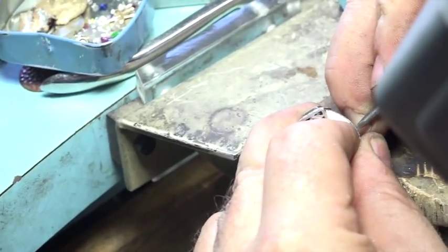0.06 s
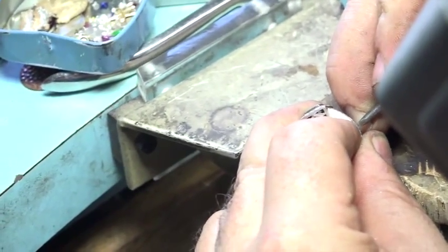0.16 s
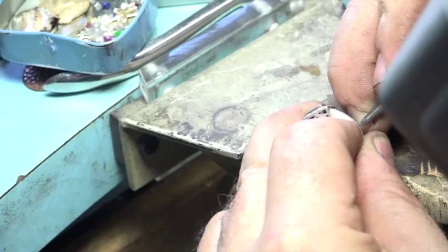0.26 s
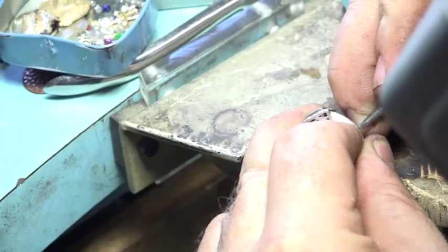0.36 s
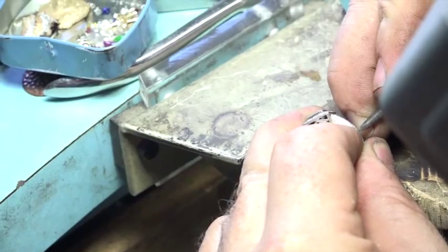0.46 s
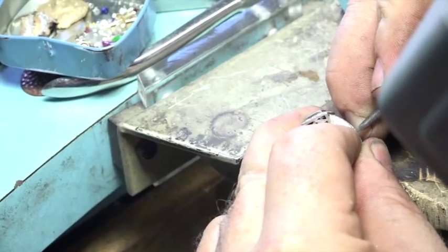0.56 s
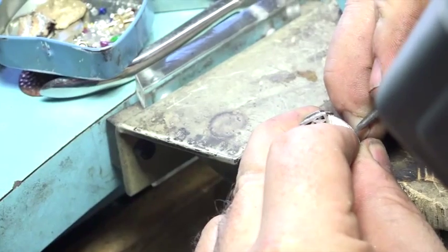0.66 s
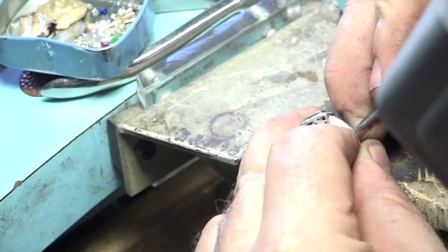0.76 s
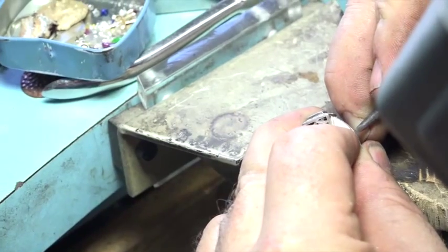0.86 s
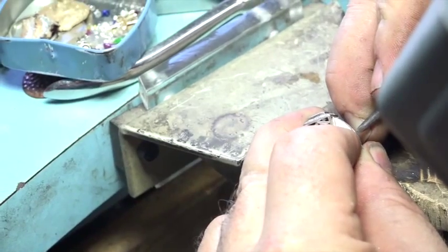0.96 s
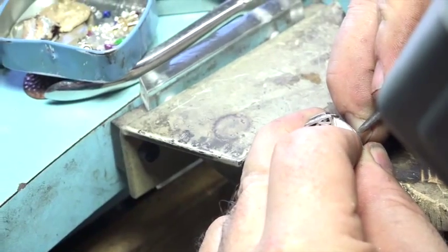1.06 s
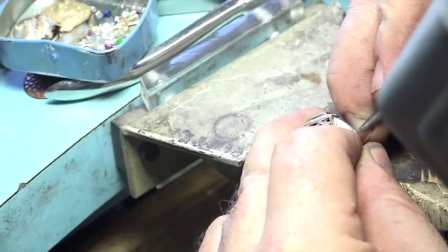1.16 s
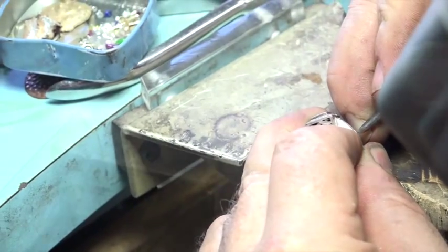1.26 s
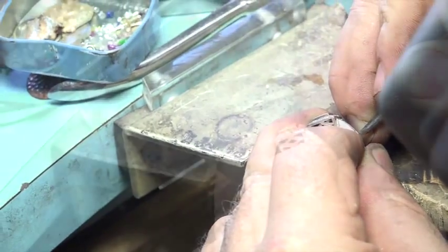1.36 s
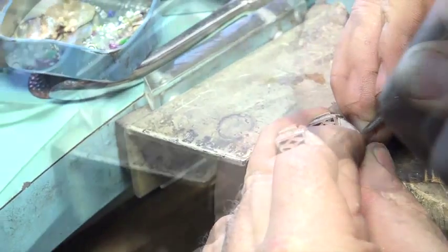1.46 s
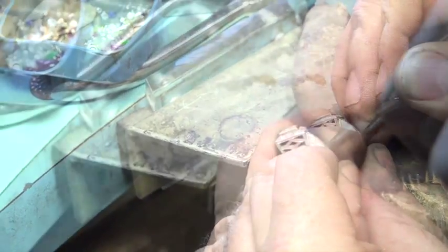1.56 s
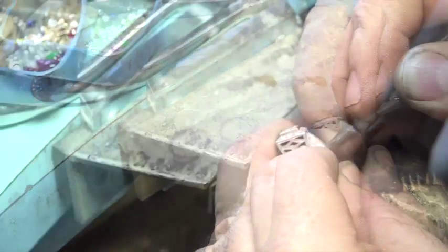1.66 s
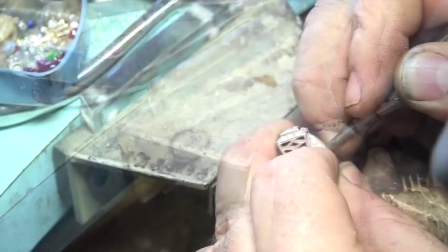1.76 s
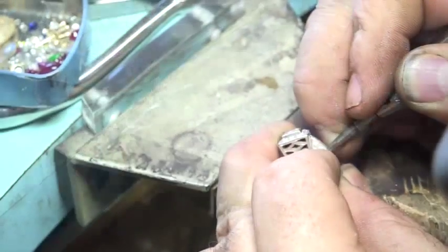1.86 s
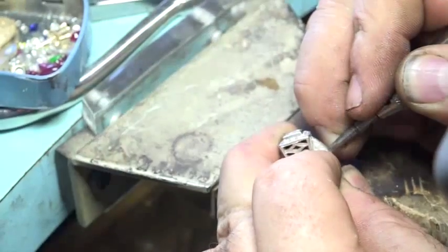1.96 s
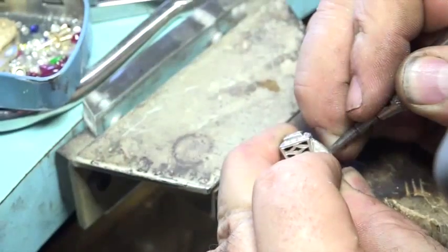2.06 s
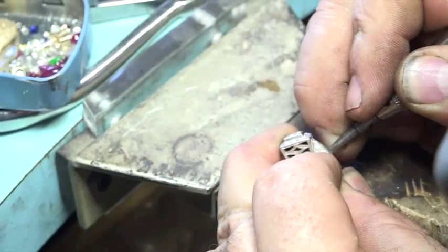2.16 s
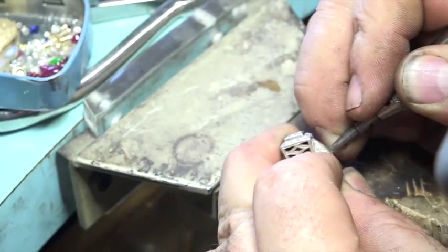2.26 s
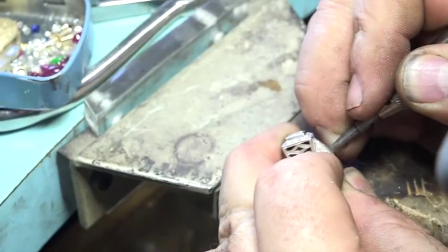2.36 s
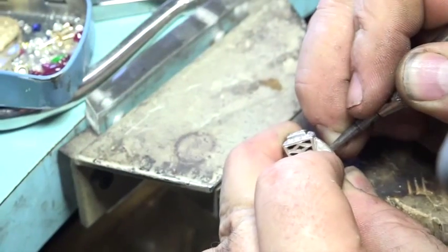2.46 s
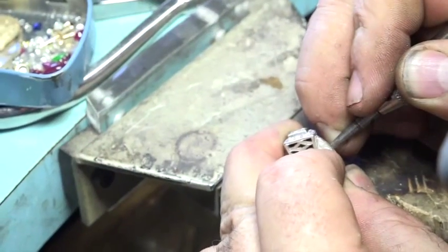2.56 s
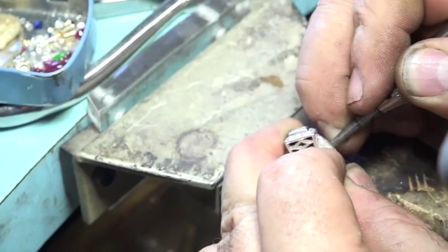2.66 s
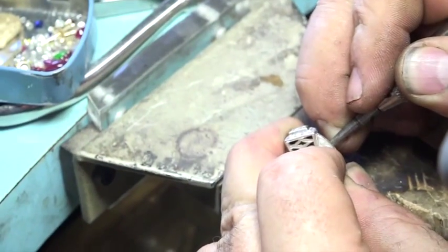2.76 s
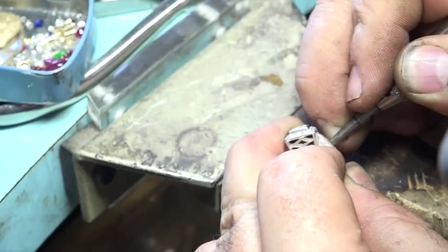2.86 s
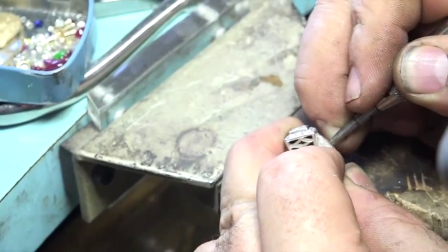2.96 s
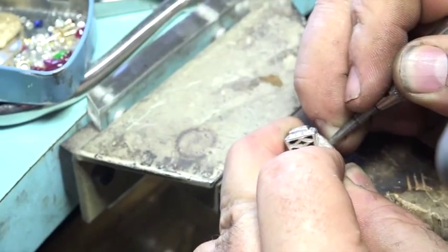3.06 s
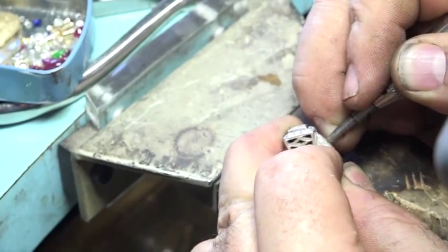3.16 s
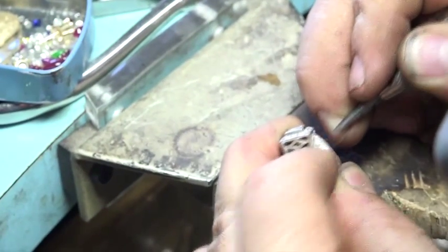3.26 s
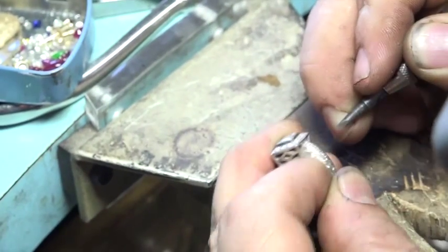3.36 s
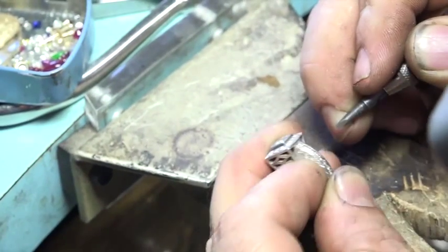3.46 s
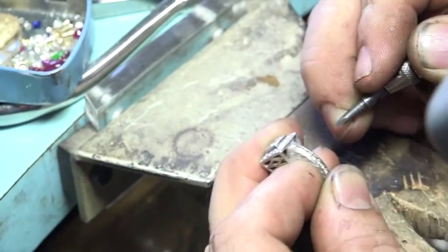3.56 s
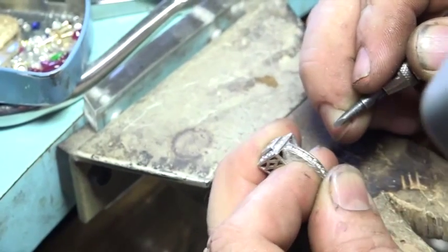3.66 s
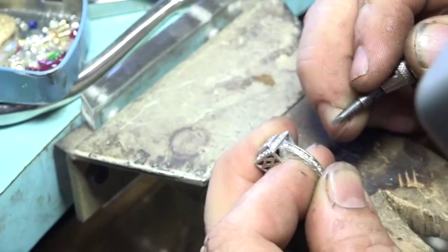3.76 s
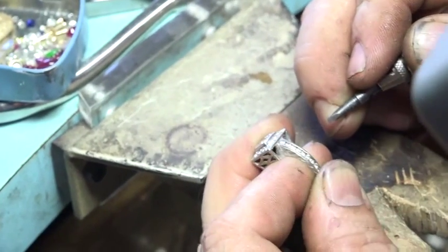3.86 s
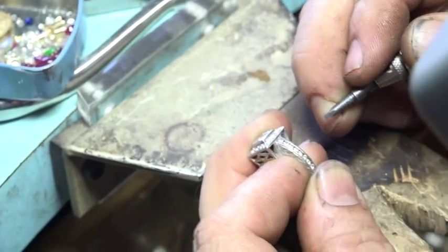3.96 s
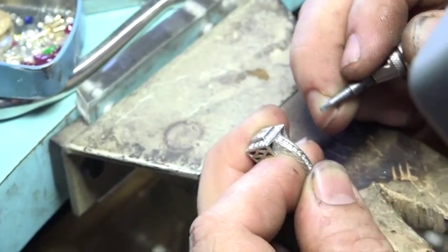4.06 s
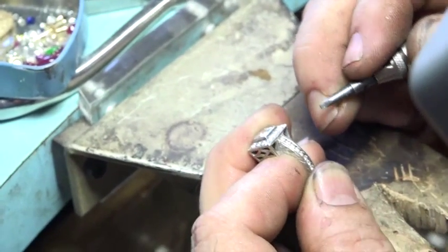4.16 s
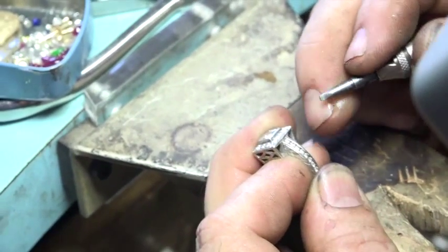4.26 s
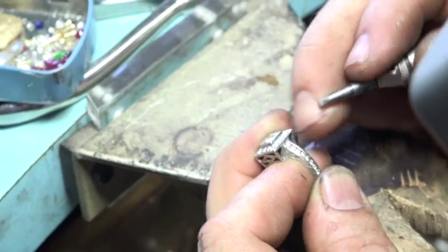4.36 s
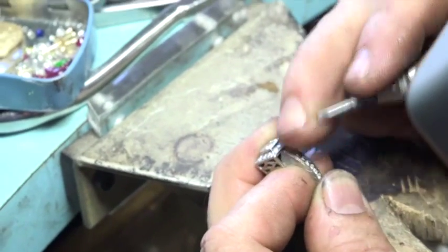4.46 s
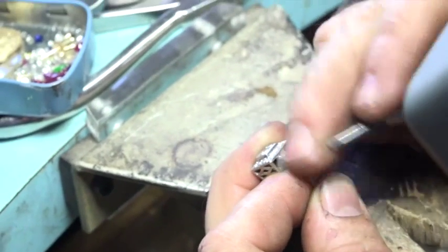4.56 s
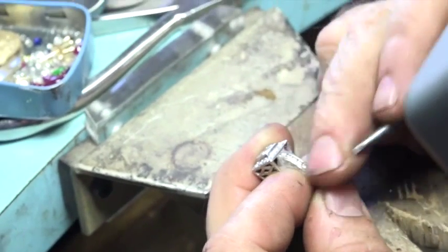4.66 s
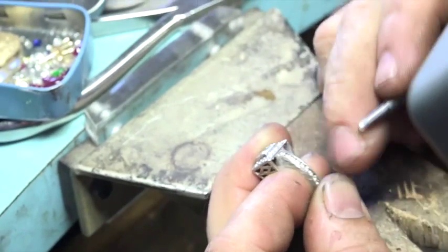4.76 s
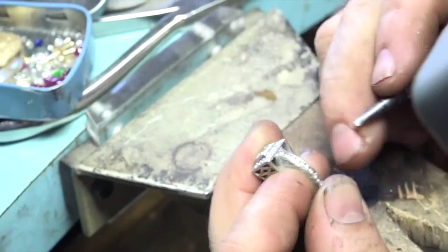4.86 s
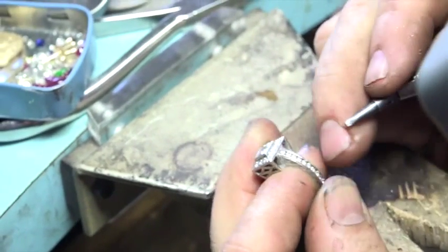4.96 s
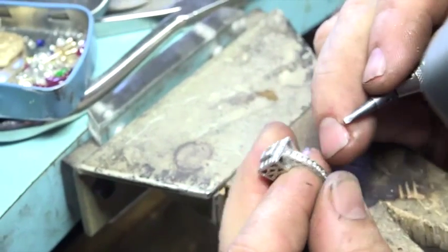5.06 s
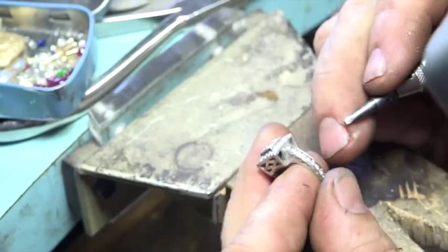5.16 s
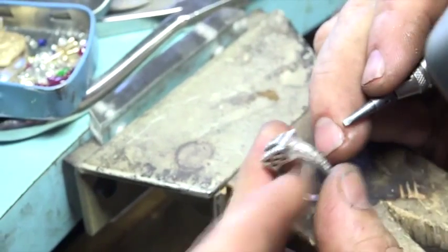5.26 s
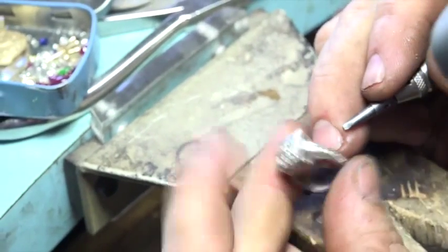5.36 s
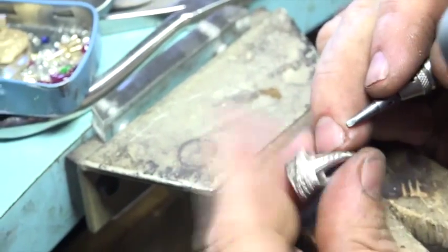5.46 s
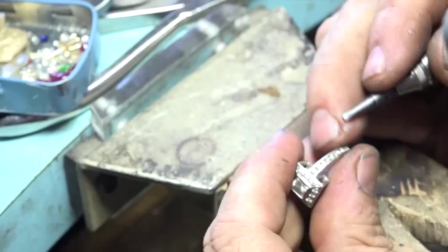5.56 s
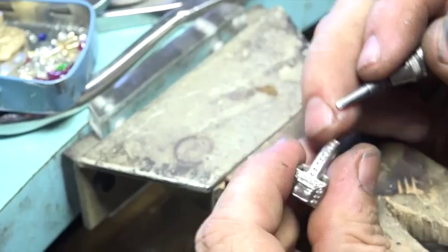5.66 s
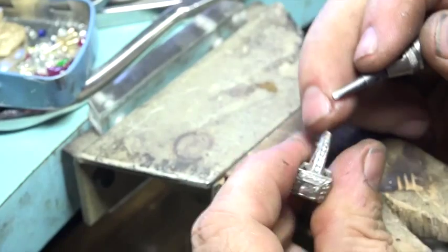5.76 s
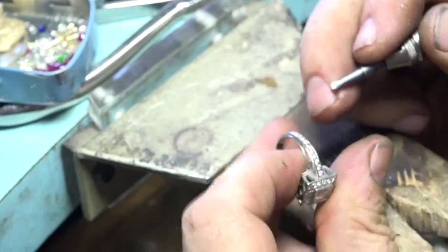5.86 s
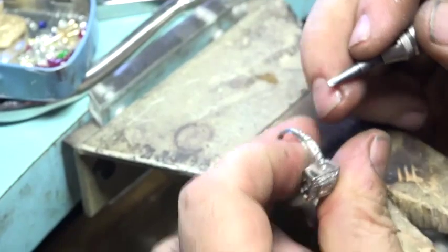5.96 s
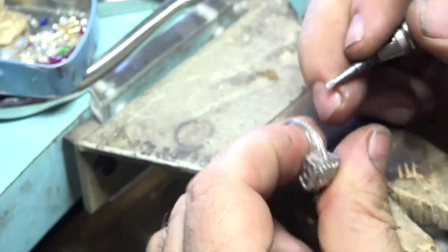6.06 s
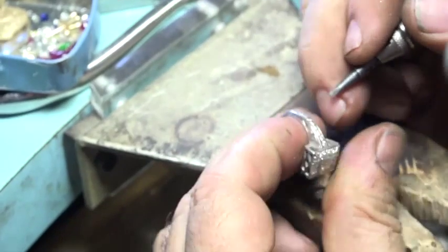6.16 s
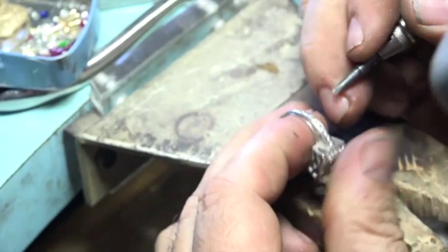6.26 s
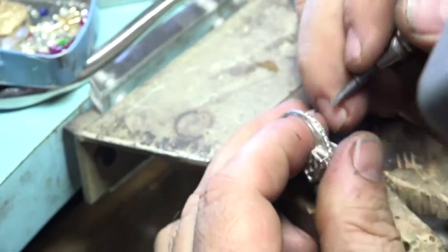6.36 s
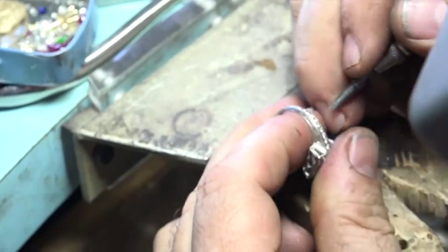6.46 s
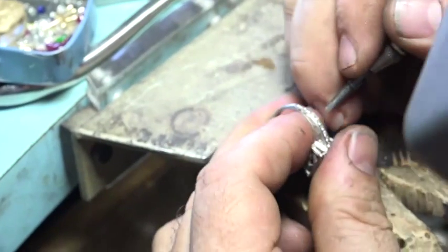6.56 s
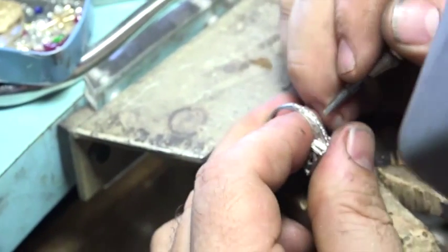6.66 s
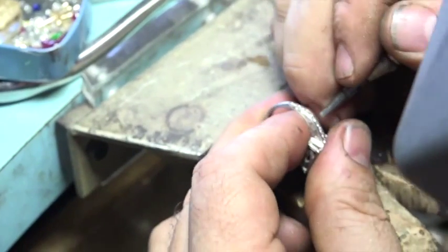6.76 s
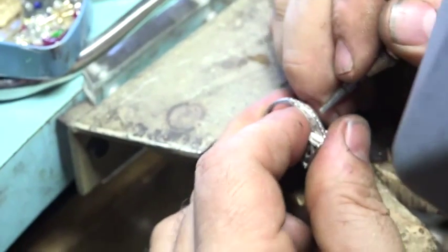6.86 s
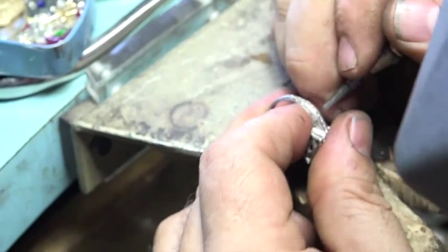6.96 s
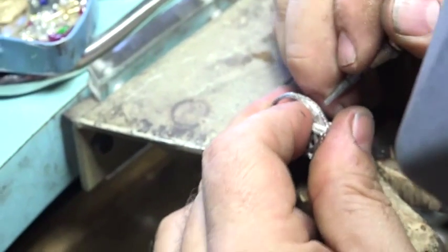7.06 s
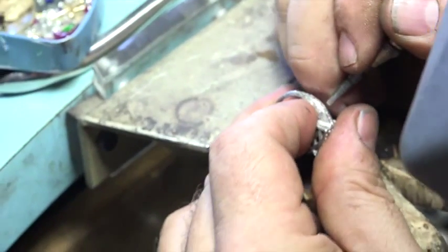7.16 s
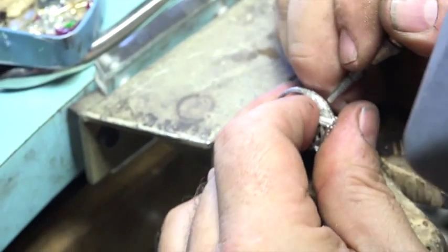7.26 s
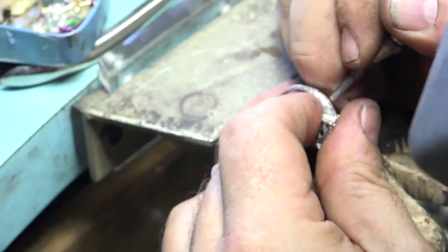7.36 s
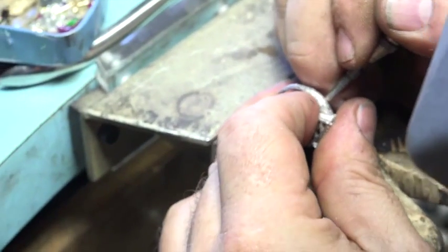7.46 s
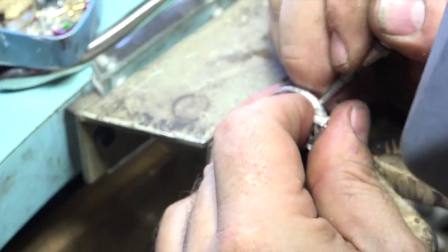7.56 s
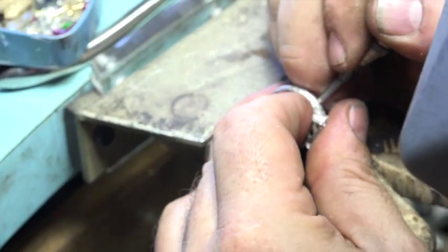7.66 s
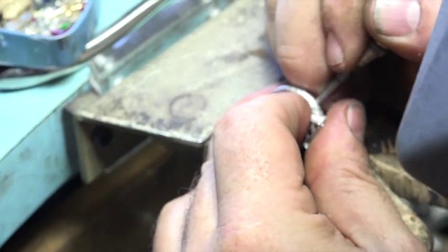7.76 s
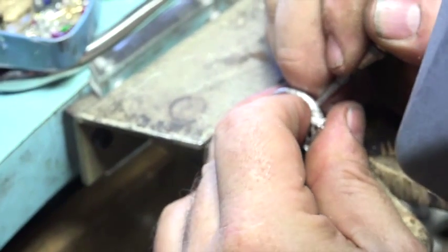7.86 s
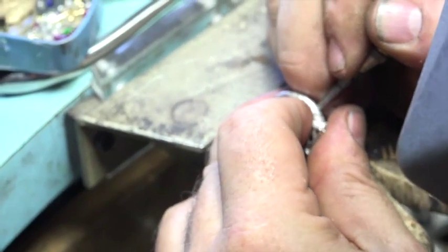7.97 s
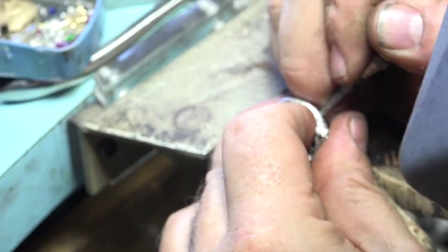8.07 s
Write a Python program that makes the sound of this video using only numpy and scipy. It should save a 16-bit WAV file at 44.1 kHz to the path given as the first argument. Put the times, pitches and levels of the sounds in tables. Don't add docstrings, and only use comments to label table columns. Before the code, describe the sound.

Fast bright metallic hammering at about twenty raps a second, a hummy workshop pause with tiny scrapes, then slower hard raps speeding up again.

```python
import sys
import numpy as np
from scipy import signal
from scipy.fft import rfft, irfft, next_fast_len
from scipy.io import wavfile
from scipy.ndimage import uniform_filter1d

SR = 44100
rng = np.random.default_rng(int(sys.argv[2]) if len(sys.argv) > 2 else 0)


def unload_wav(signal):
    wavfile.write(
        sys.argv[1],
        SR,
        np.round(np.clip(np.atleast_2d(signal).T, -1, 1) * 32767).astype(np.int16),
    )


def field_ratio(decibels):
    return 10 ** (np.asarray(decibels, dtype=float) / 20)


N = 358003
SIZE = next_fast_len(N + SR)
HZ = np.maximum(np.arange(SIZE // 2 + 1) * SR / SIZE, 1)

# time_s, speed_turns_per_s
CAM_SPEED = [
    [(0.0307, 22.4), (0.288, 23.65), (0.512, 19.81), (0.956, 20.29), (1.06, 19.49), (1.199, 20.35),
     (1.572, 19.55), (1.768, 21.58)],
    [(1.3567, 26.45), (1.694, 28.14), (1.837, 27.1), (2.326, 29.27), (2.749, 23.54), (3.104, 24.37),
     (3.314, 26.48), (3.5612, 6.3)],
    [(7.0911, 9.7), (7.282, 9.25), (7.453, 16.21), (7.638, 18.52), (7.69, 17.38), (8.002, 21.02),
     (8.0841, 24.7)],
]
# time_s, peak_db
FORCE = [
    [(0, -7), (.6, -7.5), (1.0, -8), (1.4, -7.5), (1.6, -10), (1.77, -16.5)],
    [(1.35, -13.5), (1.55, -13.5), (1.9, -7.5), (2.5, -9.5), (2.95, -8), (3.25, -6.5), (3.36, -8.5),
     (3.56, -7)],
    [(7.09, -5.5), (7.3, -6.5), (7.6, -6), (7.75, -4.5), (8.1, -5.5)],
]
USUAL_SPEED = (21, 26, 19)
# start_s, peak_db
SLIP = (7.063, -19)
# thud_db, low_steel_db, high_steel_db, top_db
CONTACT = [(-1.5, 3.5, -1, -2), (-2.5, 0.94, 3, -1), (-5, 2, -0.3, -4)]
BRIGHTER = (0.035, 0.086, 0.26, 0.21)
# cam_tick_db, rebound_db, chatter_db, shank_ring_db
BOUNCE = [(-18, -3.5, -0.5, -2.5), (-15, -9, 0, -1), (-18, -6, -6, -2)]
SLACK = (0, 0, 1.1)
# pitch_hz, level_db
STRIKE = [(300, -24), (700, -9), (2500, -2), (4100, -3.5), (4900, -4.5), (7500, -2.5), (9000, -5.5),
          (10500, -0.5), (12500, -5.5), (15300, -13.5), (16200, -24.5)]
# pitch_hz, level_db, decay_s (to -60 dB)
STEEL = [(4890, -24.5, 0.019), (4940, -23.5, 0.0129), (5970, -13.5, 0.012), (5640, -47.5, 0.012),
         (6420, -21.5, 0.027), (7160, -12.5, 0.0082), (7360, -51, 0.0172), (7510, -23.5, 0.053),
         (7680, -25.5, .02), (8040, -10.5, 0.0053), (9164, -19.5, 0.023), (9680, -21.5, 0.0089),
         (12900, -24, .012)]
# pitch_hz, level_db, decay_s (to -60 dB)
BENCH = [(922, -27, 0.029), (1102, -25.5, 0.032), (1244, -26.5, 0.028), (1666, -46, 0.013),
         (2103, -32, 0.032), (3120, -23, 0.027), (3720, -20.5, 0.021)]
# start_s, peak_db
TOUCHES = [
    (4.625, -38),
    (6.3824, -28),
    (6.6534, -34),
    (6.7331, -56),
    (6.7867, -25.5),
    (6.9002, -41),
    (7.268, -19),
    (7.882, -18),
    (7.985, -19),
]
# pitch_hz, level_db
TOUCH = [(500, -17), (1200, 0), (2500, 3), (3300, 1.5), (5500, -3.5), (7400, -12), (12000, -21)]
# pitch_hz, width_hz, level_db
RING = [(1880, 210, -0.5), (2270, 150, -6), (3130, 410, -4), (3640, 270, -9), (4600, 250, -8.5),
        (5370, 410, 0), (7020, 500, -5), (10400, 400, -18.5)]
# peak_s, level_db, rise_s, fall_s
SLIDES = [
    (5.11, -50.5, 0.15, 0.086),
    (5.81, -52.5, 0.54, 0.17),
    (6.39, -49.5, 0.14, 0.44),
    (6.55, -53.5, .3, .4),
    (6.65, -45, .03, .09),
    (6.78, -47.5, 0.037, 0.39),
]
# start_s, level_db
ENGAGE = [
    (6.982, -19.5),
    (6.987, -16.5),
    (6.991, -19.5),
    (7.052, -24),
]
# pitch_hz, level_db
CATCH = [(500, -28), (1100, -12.5), (2500, -17), (3100, -8), (3550, -0.5), (4100, -13), (5000, -11),
         (8000, -24.5), (13000, -25), (16000, -27.5)]
# pitch_hz, level_db, decay_s
CLACK = (4700, -20, 0.038)
# time_s, growl_db
MOTOR = [
    [(0, -39.5), (.5, -42), (.97, -42), (1.46, -41.5), (1.82, -39.5), (2.67, -38.5), (3.2, -38.5),
     (3.3, -39.5), (3.56, -86)],
    [(6.9, -74), (7.05, -38.5), (7.17, -45.5), (7.35, -44.5), (7.7, -41.5), (8.12, -41)],
]
# pitch_hz, width_hz, level_db
GROWL = [(174, 11, 3.5), (280, 30, -9.5), (323, 168, 9.5)]
# pitch_hz, level_db, decay_s
HOUSING = [(275, -4, .11), (395, 0, .075), (500, -5, .08)]
# pitch_hz, tone_db, haze_width_hz, haze_db
FAN = [(58.2, -69.5, 4, -54.5), (86.3, -46.5, 3.7, -57), (173, -66, 5, -57), (249.4, -58, 14, -67.5),
       (451, -57.5, 14, -58), (578.6, -48.5, 16, -60.5), (635, -54.5, 7.56, -60), (990, -60.5, 10, -64.5),
       (1380, -59.5, 9.2, -73), (1636, -70.5, 23, -65.5), (3320, -72.5, 60, -68), (4610, -76, 99, -71),
       (4540, -78, 130, -68), (4830, -61, 60, -79), (4910, -66.5, 70, -65.5), (5130, -74.5, 80, -77)]
# pitch_hz, level_db
SHOP = [(30, -7), (60, -2), (120, -6.5), (260, -0.5), (450, -9.5), (700, -11), (1200, -13.5), (2500, -21),
        (4200, -25), (4800, -29), (5600, -26.5), (7000, -33.5), (9000, -39)]
# time_s, gain_db
GAIN = [(0, 0.5), (3.55, -0.5), (3.9, -1), (5.2, 2.5), (6.95, 3.5), (7.4, 1.5), (8.12, -2)]
# time_s, level_db
WET = [(0, -2.5), (1.5, 0), (2, -4), (3.3, -4), (3.7, 2.5), (7.05, 1.5), (7.3, 4.5), (7.6, 0), (8.12, -1.5)]
# pitch_hz, likeness
LIKENESS = [(60, -0.91), (130, -0.48), (290, 0.75), (1400, 0.61), (3100, 0.98), (6800, -0.36),
            (15000, 0.043)]
# pitch_hz, left_minus_right_db
COVERED_PORT = [(60, -8), (200, -12.5), (1000, -10), (2500, -14), (4200, -18.5), (6000, -10), (7000, -5),
                (7700, 5), (8500, 5), (9500, 1), (10500, -1), (12000, -18.5), (15000, -12)]
# pitch_hz, level_db
HISS = [(1000, -9.5), (5000, -16), (9500, -5), (12500, 4.5), (14300, -2.5), (14900, -7), (15300, -52.5)]


def blows():
    rows = [[SLIP + (2, -9.5)]]
    for k, (speeds, force) in enumerate(zip(CAM_SPEED, FORCE)):
        knots, speed = np.transpose(speeds)
        t = np.arange(knots[0], knots[-1], 1 / SR)
        turns = np.cumsum(np.interp(t, knots, speed)) / SR
        s = np.interp(np.arange(round(turns[-1]) + 1), turns, t)
        peak_db = np.interp(s, *np.transpose(force))
        faster = np.interp(s, knots, speed) - USUAL_SPEED[k]
        rows.append(np.column_stack([s, peak_db, 0 * s + k, faster]))
    return np.vstack(rows).T


def hammer():
    s, peak_db, passes, faster = blows()
    which = passes.astype(int)
    luck = np.clip(rng.standard_normal((len(s), 4)), -2, 2).T
    contact = np.array(CONTACT)[which] + np.outer(faster, BRIGHTER)
    thud_db, low_db, high_db, top_db = contact.T[:, :, None]
    tick_db, rebound_db, loose_db, shank_db = np.array(BOUNCE)[which].T
    peak_db = peak_db - 0.28 * luck[0]
    rebound_s = 0.0072 + 0.0016 * luck[1]
    rebound_db = rebound_db + 2.5 * luck[2]
    tick_db = tick_db + 2.5 * luck[3] - np.array(SLACK)[which] * faster
    tick_db[np.abs(s - SLIP[0]) < .05] = -40

    chance = rng.random((len(s), 11))
    chatter_s = np.cumsum(.0006 + .0022 * chance[:, :5], axis=1)
    chatter_db = loose_db[:, None] - 1 - 1900 * chatter_s + 5 * (chance[:, 6:] - .5)
    tick_s = -.0035 - .0015 * chance[:, 5] - .0015 * (passes == 2)
    times = s[:, None] + np.column_stack([tick_s, 0 * s - .0003, rebound_s, chatter_s])
    blows_db = np.column_stack([tick_db + 5, 0 * s, rebound_db - 1, chatter_db]) + peak_db[:, None] + 5

    shared, own = rng.choice([-1, 1], (2, N))
    grit = np.array([0.9 * shared + 1.6 * own, shared])

    def crack(db, t60):
        return grit * dying(dying(clicks(times, field_ratio(blows_db + db)), t60), 0.0012)

    out = band(crack(thud_db - 27.5, 0.02), 320, 2960)
    out += band(crack(low_db - 19, 0.017), 4730, 6560)
    out += band(crack(-14.5, 0.0098), 6780, 8315)
    out += band(crack(high_db - 16.5, 0.0053), 8056, 10690)
    out += band(crack(top_db - 18.5, 0.015), 10100, 20900)
    out = colour(out, STRIKE)

    for hz, level_db, t60 in STEEL + BENCH:
        if hz < 2500:
            tilt_db = thud_db
        elif hz < 4300:
            tilt_db = thud_db + shank_db[:, None]
        elif hz < 6600:
            tilt_db = low_db
        else:
            tilt_db = high_db if hz > 8500 else 0
        spread_db = 1.5 if hz < 2500 else 3
        each = field_ratio(blows_db + tilt_db + level_db + spread_db * rng.standard_normal(times.shape))
        each[:, 2:] *= .45
        sign = rng.choice([-1, 1], times.shape)
        if hz < 4300:
            sign[:, 1] = 1
        grip = rng.choice([-1, 1], (len(s), 1)) * (hz > 4300)
        for k in np.unique(grip):
            out += ring(clicks(times + .0004, each * sign * (grip == k)), hz * (1 + 0.014 * k), t60)
    return out


def pickup():
    s, peak_db, passes, faster = blows()
    speed = faster + np.array(USUAL_SPEED)[passes.astype(int)]
    luck = rng.standard_normal((len(s), 2)).T
    load_db = np.interp(s, *np.transpose(MOTOR[0] + MOTOR[1])) + 43
    knock_db = peak_db + 0.5 * load_db + 7.5 - 31.5 + 4 * luck[1]
    early_s = 0.24 / speed * (1 + .08 * luck[0])
    return dying(clicks(s - early_s, field_ratio(knock_db)), 0.027)


def sliding():
    t = np.arange(N) / SR
    slides = sum(field_ratio(db - 10 * np.maximum((s - t) / rise, (t - s) / fall)) for s, db, rise, fall in SLIDES)
    return slides * (t < ENGAGE[0][0])


def handling():
    noise = stereo_noise()
    grit = rms_one(colour(noise, TOUCH))
    grit = rms_one(grit + 3.5 * sum(field_ratio(db) * resonance(grit, hz, width) for hz, width, db in RING))
    s, peak_db = np.transpose(TOUCHES)
    envelope = dying(clicks(s, field_ratio(peak_db - 7.5)), 0.063) + pickup()
    envelope = envelope + sliding() * field_ratio(3.16 * wobble(55))

    s, level_db = np.transpose(ENGAGE)
    clack_hz, clack_db, clack_t60 = CLACK
    clack = ring(clicks(s, field_ratio(level_db - level_db.max() + clack_db)), clack_hz, clack_t60)
    catch = rms_one(colour(noise[:, ::-1], CATCH)) * dying(clicks(s, field_ratio(level_db + 1)), 0.041)
    return clack + envelope * grit + catch


def motor():
    noise, out = stereo_noise(), 0
    cam = clicks(blows()[0], 1)
    kicked = rms_one(sum(field_ratio(db) * resonance(ring(cam, hz, t60), hz, 99) for hz, db, t60 in HOUSING))
    rough = rms_one(sum(field_ratio(db) * rms_one(resonance(noise, hz, width)) for hz, width, db in GROWL))
    whine = 0.42 * rms_one(resonance(resonance(noise, 826, 61.3), 826, 61.3))
    whine = whine + 0.69 * rms_one(resonance(ring(cam, 838, 0.041), 838, 63))
    rattle = rms_one(band(noise, 1600, 5200)) * field_ratio(3.4 * wobble(65))
    for rows in MOTOR:
        growl_db, = in_time(rows)
        whine_db = np.minimum(np.maximum(-53.5 + 7.5 * (growl_db + 40), -76), growl_db)
        rattle_db = np.where(growl_db > -100, -34.5 + 0.45 * (growl_db + 43), -120)
        boom = kicked * field_ratio(1.5 * (growl_db + 39.5))
        out = out + field_ratio(growl_db - 4.5) * (1.2 * rough + 0.98 * boom)
        out = out + field_ratio(whine_db + 1.5) * whine + field_ratio(rattle_db - 2.5) * rattle
    return out


def room(x):
    t = np.arange(SR // 2) / SR
    noise = stereo_noise()[:, :len(t)]
    noise = noise - 0.34 * resonance(noise, np.sqrt(2700 * 3430), 3430 - 2700)
    top = signal.sosfilt(signal.butter(2, 9500, "high", fs=SR, output="sos"), noise)
    tail = (noise - top) + top * field_ratio(-90 * t)
    tail = tail * field_ratio(-60 * t / 0.28) * np.clip((t - .004) / 0.0031, 0, 1)
    tail = tail / np.sqrt(np.sum(tail ** 2) / 2)
    lead = int(.0882 * SR)
    running = np.hstack([x[:, :lead], x])
    return field_ratio(-5) * signal.fftconvolve(running, tail, axes=1)[:, lead:lead + N]


def workshop():
    noise, t, out = stereo_noise(), np.arange(N) / SR, 0
    for hz, tone_db, width, haze_db in FAN:
        side = np.array([[-1 if hz < 150 else 1], [1]])
        out = out + side * field_ratio(tone_db) * np.sin(2 * np.pi * (hz * t + rng.random()))
        out = out + field_ratio(haze_db) * rms_one(resonance(resonance(noise, hz, width), hz, width))
    return out + field_ratio(-43 + 1.3 * wobble(2.9)) * rms_one(colour(noise[:, ::-1], SHOP))


def rms_one(x):
    return x / np.sqrt(np.mean(x ** 2) + 1e-20)


def in_time(rows):
    s, *columns = np.transpose(rows)
    return [np.interp(np.arange(N) / SR, s, c, left=-120, right=-120) for c in columns]


def at_hz(points, grid=HZ):
    hz, value = np.transpose(points)
    return np.interp(np.log(grid), np.log(hz), value)


def colour(x, points, size=16384):
    grid = np.maximum(np.arange(size // 2 + 1) * SR / size, 1)
    cepstrum = irfft(np.log(field_ratio(at_hz(points, grid))), size)
    cepstrum[1:size // 2] *= 2
    cepstrum[size // 2 + 1:] = 0
    response = irfft(np.exp(rfft(cepstrum)), size)
    return irfft(rfft(x, SIZE) * rfft(response, SIZE), SIZE)[..., :N]


def stereo_noise():
    mid, side = rfft(rng.standard_normal((2, SIZE)))
    alike = np.clip(at_hz(LIKENESS), -1, 1)
    both = np.sqrt((1 + alike) / 2) * mid + np.sqrt((1 - alike) / 2) * side * [[1], [-1]]
    return irfft(both, SIZE)[:, :N]


def resonance(x, hz, width_hz):
    r = np.exp(-np.pi * width_hz / SR)
    poles = [1, -2 * r * np.cos(2 * np.pi * hz / SR), r * r]
    return signal.lfilter([(1 - r * r) / 2, 0, (r * r - 1) / 2], poles, x)


def ring(trains, hz, t60):
    r, w = field_ratio(-60 / (t60 * SR)), 2 * np.pi * hz / SR
    return signal.lfilter([0, np.sin(w)], [1, -2 * r * np.cos(w), r * r], trains)


def band(x, low_hz, high_hz):
    return signal.sosfilt(signal.butter(2, [low_hz, high_hz], "band", fs=SR, output="sos"), x)


def clicks(s, gains):
    out = np.full(N, 1e-18)
    np.add.at(out, np.clip(np.round(s * SR).astype(int), 0, N - 1), gains)
    return out


def dying(x, t60):
    return signal.lfilter([1], [1, -field_ratio(-60 / (t60 * SR))], x)


def wobble(rate_hz):
    low_pass = signal.butter(2, rate_hz, fs=SR, output="sos")
    return rms_one(signal.sosfilt(low_pass, rng.standard_normal(N + SR))[SR:])


def quiet_top_dropped(x, edge_hz, floor_db):
    top = irfft(rfft(x, SIZE) * (HZ > edge_hz), SIZE)[:N]
    loud = uniform_filter1d(top ** 2, 700) > field_ratio(2 * floor_db)
    return x - top * (1 - uniform_filter1d(1.0 * loud, 300))


def scene():
    bench = hammer() + handling()
    near = bench + field_ratio(in_time(WET)[0]) * room(bench)
    near = signal.sosfilt(signal.butter(2, 600, "high", fs=SR, output="sos"), near)
    return near + motor() + field_ratio(in_time(GAIN)[0]) * workshop()


def roll_off(x):
    return signal.sosfilt(signal.butter(12, 16500, fs=SR, output="sos"), x)


def record(dry):
    ports = np.array([colour(dry[0], COVERED_PORT), dry[1]])
    hiss = rms_one(colour(rng.standard_normal((2, N)), HISS)) * field_ratio([[-1.5], [0]])
    hiss = field_ratio(-64.5 + in_time(GAIN)[0]) * hiss
    left, right = 1.15 * np.tanh((ports + hiss) / 1.15)
    both = [quiet_top_dropped(left, 11450, -47), quiet_top_dropped(right, 14800, -58)]
    mix = signal.sosfilt(signal.cheby2(12, 45, 16100, fs=SR, output="sos"), both)
    return roll_off(mix)


dry = scene()
out = record(dry)
unload_wav(out)
```